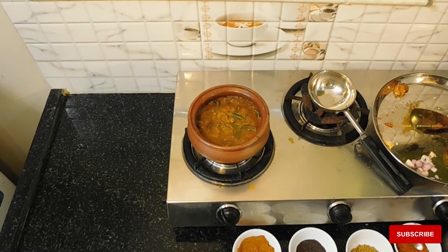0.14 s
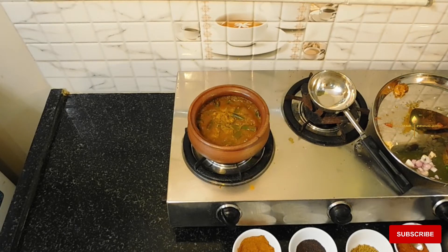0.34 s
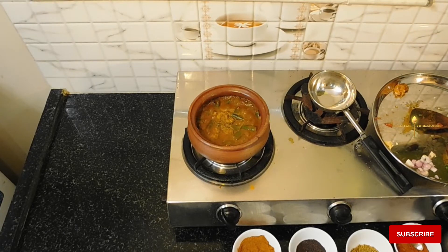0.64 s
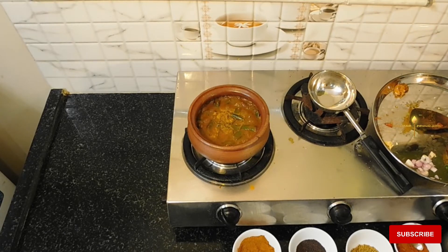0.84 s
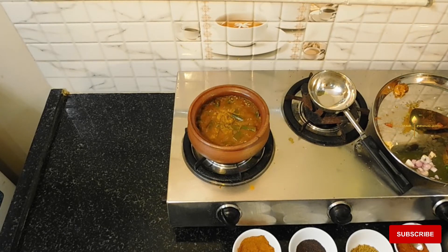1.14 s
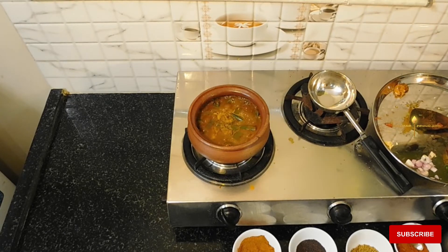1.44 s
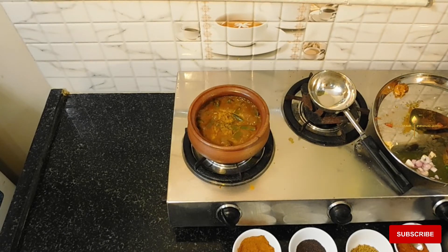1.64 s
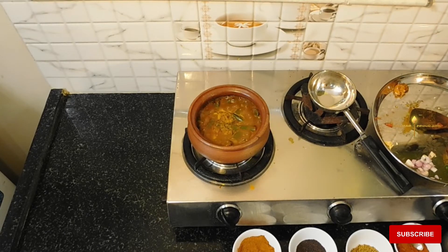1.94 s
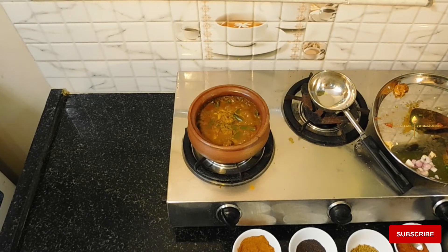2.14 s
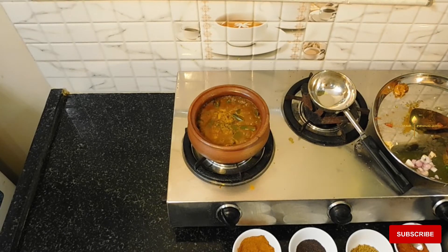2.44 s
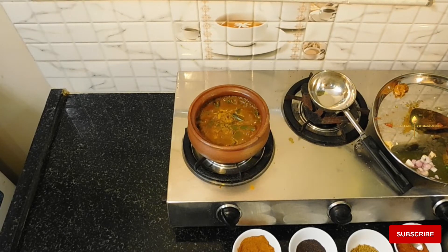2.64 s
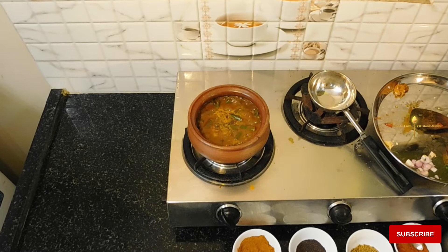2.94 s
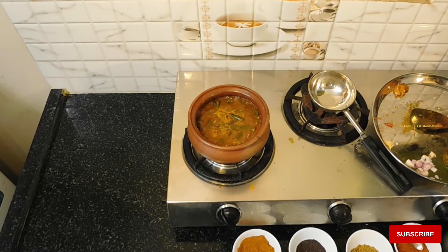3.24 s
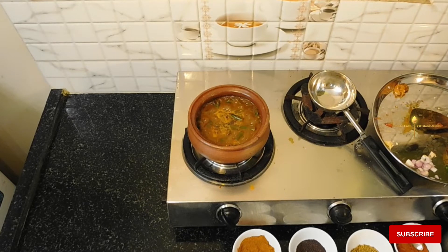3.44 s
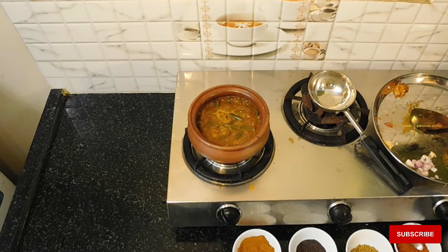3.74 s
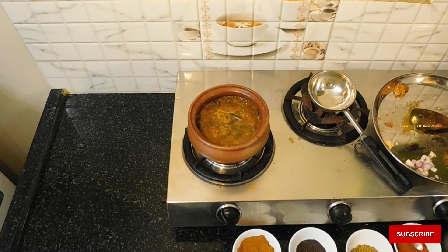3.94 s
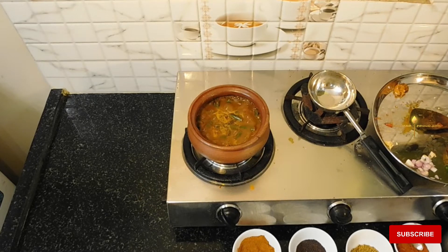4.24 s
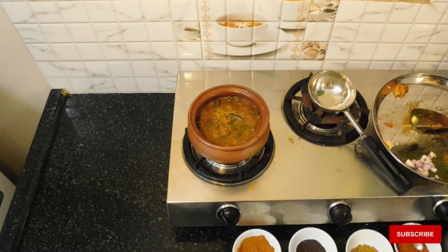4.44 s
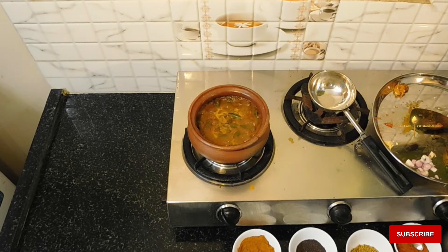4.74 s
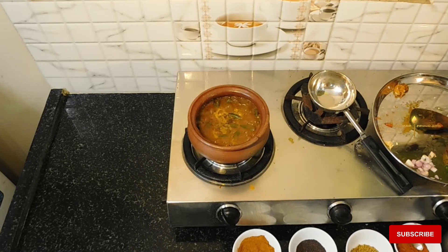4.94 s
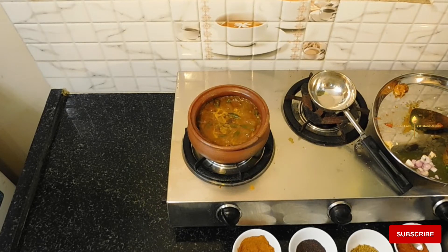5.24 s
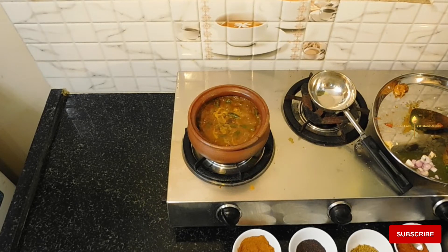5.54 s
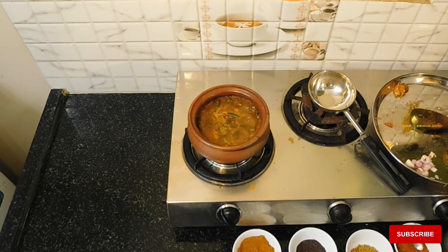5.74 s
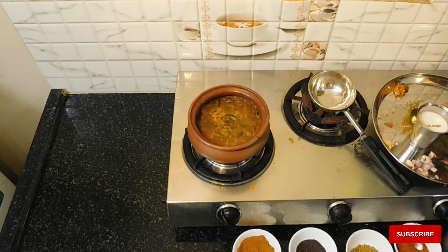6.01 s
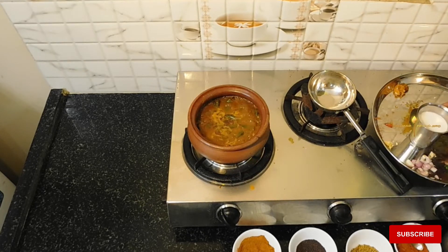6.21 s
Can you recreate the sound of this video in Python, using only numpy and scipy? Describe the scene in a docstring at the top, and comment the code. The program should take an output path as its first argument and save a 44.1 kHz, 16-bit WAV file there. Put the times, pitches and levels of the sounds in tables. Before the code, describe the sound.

Thick gravy simmers quietly in a clay pot for about six and a half seconds. Bubbles burst irregularly as short, breathy puffs and sharp little spits over a light sizzle, with a barely audible flame rumble underneath. Stronger spits come around 0.2 and 3.3 seconds. Faint, brief, high steam whistles slide upward at 1.3 seconds and downward at 2.8 and 3.5 seconds. Nearby, steel vessels are set down, each with a short ring, louder than the bubbling: a cup clinks at 2 seconds, a bowl rings brightly at 3.1, a pan gives the loudest, lower double knock at 3.8, and a ladle taps lightly at 5.1. The simmer continues to the end, a little softer. The small tiled kitchen adds a short reverberation. The microphone is distant and nearly mono, with little bass and a dull top, and the background drops low between bursts.

```python
"""Thick gravy spits and bubbles in a clay pot on a steel stove in a small tiled kitchen.
Each bubble bursts in a short puff of steam, coloured by the air resonances of pot and stove top,
and three steam jets whistle over a faint flame rumble. Nearby, someone sets down a steel cup, bowl,
pan and ladle, which knock and ring. The microphone is distant and nearly mono, with little bass
and a dull top; a noise suppressor turns down the steady sound between bursts."""
import sys
import numpy as np
from scipy import signal
from scipy.fft import rfft, irfft, next_fast_len
from scipy.io import wavfile
from scipy.ndimage import uniform_filter1d

SR = 44100
rng = np.random.default_rng(int(sys.argv[2]) if len(sys.argv) > 2 else 0)


def digitize_waveform(pressure):
    """Quantize a signal to 16-bit integers and store it at the path in sys.argv[1].

    Rows of a 2-D input are taken as channels; values are limited to [-1, 1].
    """
    field = np.atleast_2d(pressure).T
    bounded = np.clip(field, -1, 1)
    quanta = np.round(bounded * 32767).astype(np.int16)
    wavfile.write(sys.argv[1], SR, quanta)


N = 280912


def amp(db):
    return 10 ** (np.asarray(db) / 20)


def rms_one(x):
    return x / np.sqrt(np.mean(x ** 2) + 1e-30)


def db_at(spectrum, hz):
    points_hz, points_db = np.transpose(spectrum)
    return np.interp(np.log(hz), np.log(points_hz), points_db)


def band(x, low_hz, high_hz):
    edges = [max(low_hz, 20), min(high_hz, 15000)]
    return signal.sosfilt(signal.butter(3, edges, "band", fs=SR, output="sos"), x)


def coloured_noise(spectrum, size):
    """Noise of the given spectrum, rms 1."""
    hz = np.maximum(np.fft.rfftfreq(size, 1 / SR), 1)
    return rms_one(irfft(rfft(rng.standard_normal(size)) * amp(db_at(spectrum, hz)), size))


def swell(t, rise_s, t60):
    """Quick attack, then a decay of 60 dB in t60 seconds."""
    return (1 - np.exp(-t / rise_s)) * amp(-60 * t / t60)


def add(out, start_s, sound):
    i = round(start_s * SR)
    out[i:i + len(sound)] += sound[:N - i]


ROOM_RISE_S, ROOM_T60_S = 0.004, 0.22
def kitchen(x):
    """Diffuse reflections off the tiles: a tail of decaying noise of unit energy."""
    t = np.arange(SR // 3) / SR
    tail = rng.standard_normal(len(t)) * swell(t, ROOM_RISE_S, ROOM_T60_S)
    return signal.fftconvolve(x, tail / np.sqrt(np.sum(tail ** 2)))[:N]


# Tone of the flame. Each row: frequency in Hz, relative level in dB.
FLAME_SPECTRUM = [(15, -51), (25, -8.5), (220, -3), (492, -9), (565, -5.5), (701, -12), (857, -6),
                  (1000, -17), (1300, -31), (2200, -120)]
def flame(level_db=-82.5, lumps_db=2.0):
    """The flame lays down a low rumble whose level wavers unevenly."""
    lumps = np.interp(np.arange(N) / 3000, np.arange(N // 3000 + 2), rng.standard_normal(N // 3000 + 2))
    return amp(level_db + lumps_db * lumps) * coloured_noise(FLAME_SPECTRUM, N)


def struck_steel(pitches, modes, knock_spectrum, blows):
    """Each blow of steel on stone rings every mode and gives a broad knock; returns ring and knock."""
    ring, knock, t = np.zeros(N), np.zeros(N), np.arange(SR // 3) / SR
    hz = np.array(pitches)[:, None]
    mode_db, t60 = np.transpose(modes)[:, :, None]
    rise_s = 0.0082 * (1000 / hz) ** 0.5   # low modes build up more slowly
    partials = amp(mode_db) * swell(t, rise_s, t60) * np.sin(2 * np.pi * hz * t)
    knock_shape = swell(t, ROOM_RISE_S, ROOM_T60_S)   # the knock arrives as reverberation
    # The vessel rocks on its base, so the modes waver, high ones most.
    rocking_filter = signal.butter(2, 60, fs=SR, output="sos")
    waver_depth = 0.58 * (hz / 4000) ** 0.6
    for start, ring_db, knock_db in blows:
        rocking = rms_one(signal.sosfilt(rocking_filter, rng.standard_normal(partials.shape)))
        add(ring, start, amp(ring_db) * np.sum((1 + waver_depth * rocking) * partials, axis=0))
        add(knock, start, amp(knock_db) * coloured_noise(knock_spectrum, len(t)) * knock_shape)
    return ring, knock


# Pitches of each vessel's ring. Each entry: one mode's frequency in Hz.
CUP_HZ = [1034, 1443, 1550, 3625, 6379, 6900, 7203, 8480, 9502]
BOWL_HZ = [540, 571, 851, 1057, 1995, 2191, 2336, 3887, 4744, 5233, 5949, 6885, 7195, 7398, 7685, 8010,
           8274, 8656, 9258]
PAN_HZ = [253, 540, 572, 818, 988, 1033, 1180, 1234, 1645, 1983, 4836, 5720, 6896, 8285, 9285]
LADLE_HZ = [1222, 1300, 1406]
# The same modes, in order. Each row: relative level in dB, T60 decay in seconds.
CUP_MODES = [(8, 0.16), (1, 0.1), (-4.5, 0.13), (-6, 0.27), (-32, 0.16), (-18.5, 0.33), (-14.5, 0.63),
             (-13, 0.31), (-37, 0.099)]
BOWL_MODES = [(2.5, 0.23), (-17.5, 0.42), (-7.5, 0.25), (-5, 0.15), (-4.5, 0.13), (-18, 0.43), (-15, 0.064),
              (-34.5, .12), (-9.5, 0.33), (-16.5, .14), (-18.5, 0.29), (-16, 0.24), (-18, .16),
              (-2.5, 0.17), (-1, 0.23), (-25.5, .2), (-11, 0.047), (-20, 0.14), (-11.5, 0.18)]
PAN_MODES = [(-31.5, 0.17), (-19.5, 0.16), (-17.5, .15), (-16, 0.099), (-14.5, 0.16), (2, 0.12),
             (-4, 0.088), (-2.5, 0.21), (-7, 0.24), (-27.5, 0.25), (-22, 0.25), (-21, 0.17), (-29, 0.41),
             (-32.5, 0.32), (-19, 0.068)]
LADLE_MODES = [(-20, 0.29), (9, 0.097), (-0.5, .24)]
# Tone of the knock under each vessel. Each row: frequency in Hz, relative level in dB.
CUP_KNOCK = [(180, -79), (300, -56), (899, -69), (1030, -20), (1320, 17), (3630, 6), (10400, 12.5),
             (13500, -20), (22000, -120)]
BOWL_KNOCK = [(180, -106.5), (300, -119), (543, -7.5), (731, -25), (1030, -13), (2030, -25.5),
              (3370, -37.5), (7500, -22), (10400, -21), (13500, -55), (22000, -120)]
PAN_KNOCK = [(120, -53.5), (250, -29), (600, -21.5), (1100, -6.5), (1700, -21), (2000, -31), (3200, -30),
             (4000, -47), (5800, -32), (7700, -52), (9400, -25.5), (10400, -77)]
# Cues for the clinks. Each row: start in seconds, vessel, ring gain in dB, knock gain in dB.
BLOWS = [(2.009, "cup", -44, -50.5), (2.03, "cup", -87, -51), (3.064, "bowl", -30, -35),
         (3.822, "pan", -19, -42.5), (3.84, "pan", -22, -32.5), (5.108, "ladle", -47.5, -81),
         (5.117, "ladle", -38.5, -76.5)]
def vessels():
    """Four steel vessels are set down, each landing once or twice; returns their rings and knocks."""
    kit = {"cup": (CUP_HZ, CUP_MODES, CUP_KNOCK), "bowl": (BOWL_HZ, BOWL_MODES, BOWL_KNOCK),
           "pan": (PAN_HZ, PAN_MODES, PAN_KNOCK), "ladle": (LADLE_HZ, LADLE_MODES, CUP_KNOCK)}
    clinks = []
    for name, voice in kit.items():
        blows = [(start, ring_db, knock_db) for start, which, ring_db, knock_db in BLOWS if which == name]
        clinks.append(struck_steel(*voice, blows))
    return np.sum(clinks, axis=0)


# Steam whistles. Each row: times in seconds when the jet opens, is full and shuts,
# first and last pitch in Hz, full level in dB.
JETS = [(1.272, 1.288, 1.41, 5350, 5895, -58.5), (2.644, 2.812, 2.88, 5690, 4670, -63),
        (3.393, 3.546, 3.6, 5760, 4377, -61.5)]
def steam_jets(width_hz=220, swell_db=17.5, fade_db_per_s=301, room_db=0.5):
    """Steam through a changing gap: narrow noise on a gliding pitch that swells, holds and fades."""
    out, wander = np.zeros(N), signal.butter(2, width_hz / 2, fs=SR, output="sos")
    for opens, full, shuts, first_hz, last_hz, db in JETS:
        t = opens + np.arange(SR // 2) / SR
        wobble = signal.sosfilt(wander, rng.standard_normal((2, len(t))))
        phase = 2 * np.pi * np.cumsum(np.interp(t, [opens, shuts], [first_hz, last_hz])) / SR
        whistle = rms_one(wobble[0] * np.cos(phase) + wobble[1] * np.sin(phase))
        level_db = np.interp(t, [opens, full], [db - swell_db, db])
        level_db -= fade_db_per_s * np.maximum(t - shuts, 0)
        add(out, opens, amp(level_db) * whistle)
    return out + amp(room_db) * kitchen(out)


# Peaks (+) and notches (-) of pot and stove top. Each row: centre in Hz, width in Hz, gain in dB.
POT_RESONANCES = [(1413.4, 62, 13.5), (2180, 64, 8), (2800, 100, -10.5), (3140, 130, 3.5), (3640, 140, -4),
                  (4092, 82, 5.5), (4957, 42, 5.5), (5466, 150, -12.5), (5930, 32, 13), (6500, 260, -1.5),
                  (7060, 280, 2), (8930, 22, 18.5)]
def pot(x):
    """The same air resonances colour every bubble in the pot."""
    size = next_fast_len(N + 4096)
    hz = np.fft.rfftfreq(size, 1 / SR)
    gain_db = sum(db / (1 + (2 * (hz - centre) / width) ** 2) for centre, width, db in POT_RESONANCES)
    return irfft(rfft(x, size) * amp(gain_db), size)[:N]


# Tone of the simmer. Each row: frequency in Hz, relative level in dB.
SIMMER_SPECTRUM = [(240, -52), (400, -16.5), (1010, 4), (1380, -13), (1610, -7.5), (2140, -10),
                   (3180, -16.5), (3540, -21.5), (4060, -11), (6030, -15), (10400, -28), (13500, -48.5),
                   (22000, -120)]
# Fader moves for the simmer. Each row: time in seconds, then gains in dB for bubbles, spatter
# and fine spatter.
SIMMER_VIGOUR = [(0.0, -71.5, -67, -65.5), (0.35, -76, -70.5, -64.5), (0.85, -78.5, -71.5, -73),
                 (1.4, -66.5, -67.5, -68.5), (1.88, -74, -72.5, -72.5), (2.22, -71, -68.5, -67),
                 (2.46, -77, -70.5, -68.5), (2.77, -70, -72, -70), (3.09, -62, -72, -70),
                 (3.41, -78, -72.5, -78), (3.71, -78.5, -71.5, -70.5), (3.9, -75, -69.5, -70),
                 (4.26, -74.5, -72.5, -74.5), (4.45, -77, -65.5, -74.5), (4.75, -75, -70, -68),
                 (5.32, -76, -69.5, -74.5), (5.96, -77, -69.5, -73), (6.37, -77, -67, -71)]
def simmer(bursts_per_band_per_s=16, spread_db=6, rise_s=0.0087, t60_s=0.19):
    """Small bubbles burst at random, each a puff of narrow noise that dies away in the room."""
    hop = 64   # samples per envelope step
    t, slow_t = np.arange(N) / SR, np.arange(N // hop + 2) * hop / SR
    edges_hz = np.concatenate([np.arange(450, 2800, 130), np.arange(2800, 10700, 200)])
    white, stems = rng.standard_normal((2, N)), np.zeros((4, N))
    puff_power = swell(slow_t[:400], rise_s, t60_s) ** 2
    bursts_below = 0
    for k, (low, high) in enumerate(zip(edges_hz, edges_hz[1:])):
        hz = (low + high) / 2
        onsets = rng.random(len(slow_t)) < bursts_per_band_per_s * hop / SR
        bursts = onsets * amp(spread_db * rng.exponential(1, len(slow_t)).clip(0, 3)) ** 2
        power = np.convolve(bursts + 0.24 * bursts_below, puff_power)[:len(slow_t)]
        power += 0.35 if 3700 < hz < 6200 else 0.05   # steady bed: the sizzle hardly stops
        bursts_below = bursts   # a burst spills into the next band
        gain = amp(db_at(SIMMER_SPECTRUM, hz)) * np.interp(t, slow_t, np.sqrt(power))
        stem = int(hz > 1100) + int(hz > 2800) + int(hz > 5500)
        stems[stem] += gain * band(white[k % 2], low, high)
    times, bubbles_db, spatter_db, fine_db = np.transpose(SIMMER_VIGOUR)
    faders_db = bubbles_db - 5, bubbles_db + 1.5, spatter_db, fine_db   # low stem to high
    return sum(amp(np.interp(t, times, db)) * rms_one(stem) for db, stem in zip(faders_db, stems))


# Sharp accents. Each row: start in seconds, gain in dB, centre in Hz.
SNAPS = [(0.186, -48.5, 6140), (0.223, -55, 6570), (0.777, -53, 4670), (1.282, -64, 6810),
         (2.996, -53, 960), (3.256, -47.5, 4195), (4.044, -53, 530), (4.48, -56, 5010), (4.54, -54.5, 6030),
         (4.644, -56.5, 3970), (4.715, -54, 2155), (5.53, -64.5, 1430), (5.69, -59.5, 1562)]
def snaps(rise_s=0.0008, t60_s=0.04):
    """A bubble's skin bursts: a very short puff about half an octave wide."""
    out, t = np.zeros(N), np.arange(SR // 8) / SR
    for start, db, hz in SNAPS:
        noise = rms_one(band(rng.standard_normal(len(t)), hz * 0.82, hz * 1.22))
        add(out, start, amp(db) * noise * swell(t, rise_s, t60_s))
    return out


# Foreground bubbles. Each row: start in seconds, gain in dB, centre in Hz, width in Hz,
# T60 decay in seconds.
POPS = [(0.002, -52.5, 6070, 3000, 0.35), (0.189, -52, 7670, 430, 0.24), (0.212, -43, 6280, 680, 0.23),
        (0.268, -57.5, 3150, 680, 0.35), (0.382, -54.5, 1265, 140, 0.36), (0.388, -62, 3620, 1540, .76),
        (0.403, -60, 6460, 940, 1), (0.477, -55, 8000, 860, 0.28), (0.55, -54, 5570, 2480, 0.13),
        (0.675, -64, 1470, 940, .58), (0.796, -60, 4530, 3000, .55), (0.98, -75, 200, 100, 0.18),
        (1.003, -58, 3570, 1460, 0.37), (1.005, -61.5, 2010, 510, 0.3), (1.145, -57, 2480, 1370, .26),
        (1.261, -75.5, 150, 100, 0.38), (1.262, -59, 1650, 1890, 0.15), (1.48, -70, 218, 70, 0.23),
        (1.501, -55.5, 4710, 150, 0.48), (1.5, -64, 8200, 3080, 0.76), (2.182, -58.5, 5680, 430, 0.28),
        (2.252, -57, 4820, 340, 0.21), (2.291, -58, 7060, 3000, 0.14), (2.498, -60.5, 143.5, 60, .36),
        (2.563, -61, 1297, 250, 0.4), (2.567, -55.5, 7700, 1290, 0.19), (2.801, -53, 1560, 940, 0.19),
        (2.821, -69, 151, 80, 0.24), (2.845, -49.5, 7600, 1980, .13), (2.893, -67, 1234, 1290, .26),
        (3.241, -52, 4370, 2320, .5), (3.602, -62.5, 4490, 1630, 0.29), (4.04, -53, 967, 940, 0.18),
        (4.254, -57.5, 5000, 940, 0.34), (4.478, -62, 6600, 5000, .13), (4.52, -69, 2120, 241, 0.78),
        (4.644, -59.5, 4600, 1460, .29), (4.707, -56.5, 2660, 1370, 0.24), (4.708, -60.5, 6360, 1370, 0.37),
        (4.834, -60, 1273, 340, 0.26), (5.19, -66, 2173, 256, 0.94), (5.235, -64, 6520, 1460, 0.64),
        (5.523, -64.5, 5100, 6000, 0.18), (5.69, -62.5, 1394, 250, 0.35), (5.721, -58, 4760, 1290, 0.21),
        (6.252, -63, 1160, 1110, .41)]
def pops(rise_s=0.0082):
    """Single loud bubbles each let out a puff of steam: a band of noise with a soft attack."""
    out, t = np.zeros(N), np.arange(SR // 2) / SR
    for start, db, hz, width, t60 in POPS:
        noise = rms_one(band(rng.standard_normal(len(t)), hz - width / 2, hz + width / 2))
        add(out, start, amp(db) * noise * swell(t, rise_s, t60))
    return out


def scene(ring_room_db=-9, side_db=-18):
    """Pot and flame sit in the middle; only the clinks have width, leaning a little to the right."""
    ring, knock = vessels()
    gravy = pot(simmer() + pops() + snaps())
    mid = gravy + steam_jets() + flame() + ring + knock + amp(ring_room_db) * kitchen(ring)
    side = amp(side_db) * band(kitchen(ring + knock) + ring, 450, 4000)
    return np.array([mid - side, mid + side])


def noise_suppressor(x, threshold_db=-5, floor_db=-19, memory=0.35):
    """Frequency bins near their usual level are turned down; what stands out passes."""
    bins = signal.stft(x, nperseg=1024, noverlap=768)[2]
    instant_power = np.mean(abs(bins) ** 2, axis=0)
    power = signal.lfilter([1 - memory], [1, -memory], instant_power)
    power = np.maximum(power, instant_power / 2)
    usual_power = uniform_filter1d(np.median(power, axis=1), size=25)[:, None]
    gain = np.maximum(1 - usual_power * amp(threshold_db) ** 2 / (power + 1e-20), amp(floor_db))
    return signal.istft(bins * gain, nperseg=1024, noverlap=768)[1][:, :N]


def record(dry, mic_top_hz=10800, output_top_hz=15700, hiss_db=-92):
    """Noise suppression, a dull microphone path and a faint electronic hiss that reaches higher."""
    mic_filter = signal.cheby2(14, 60, mic_top_hz, fs=SR, output="sos")
    output_filter = signal.cheby2(12, 30, output_top_hz, fs=SR, output="sos")
    heard = signal.sosfilt(mic_filter, noise_suppressor(dry))
    hiss = amp(hiss_db) * (rng.standard_normal(N) + 0.25 * rng.standard_normal((2, N)))
    return signal.sosfilt(output_filter, heard + hiss)


dry = scene()
out = record(dry)
digitize_waveform(out)
```